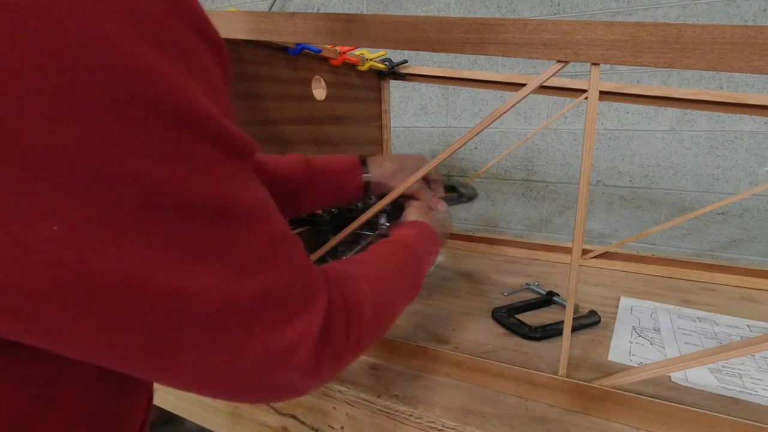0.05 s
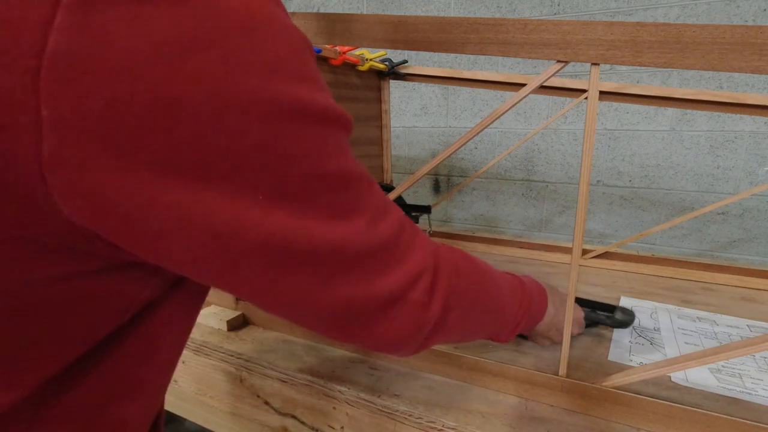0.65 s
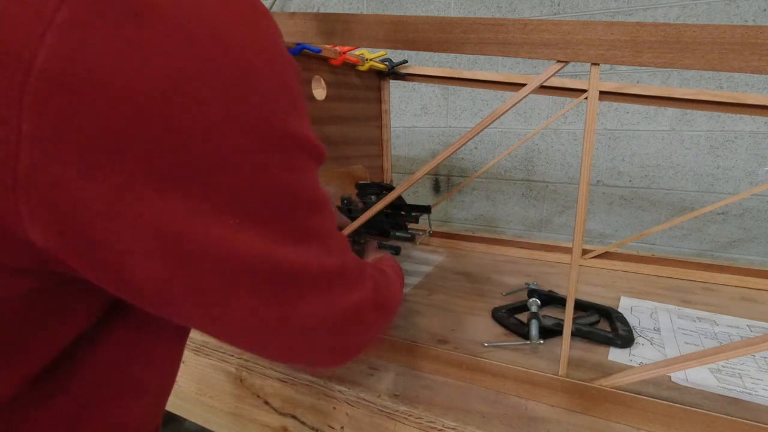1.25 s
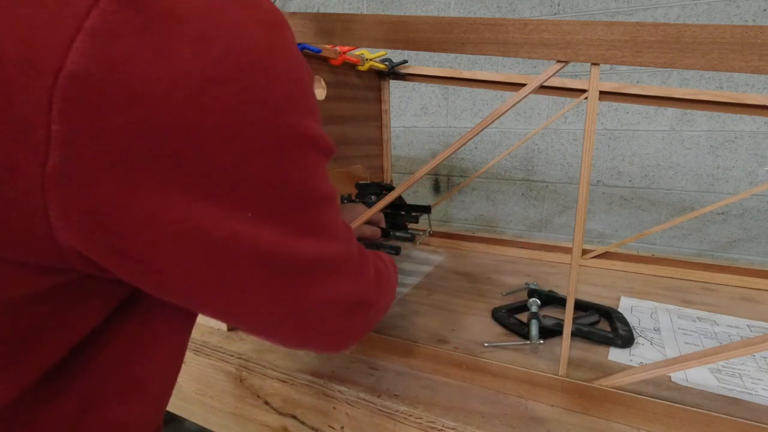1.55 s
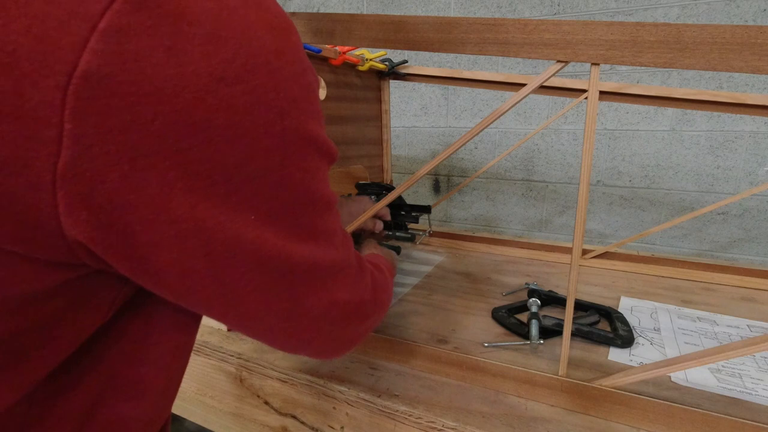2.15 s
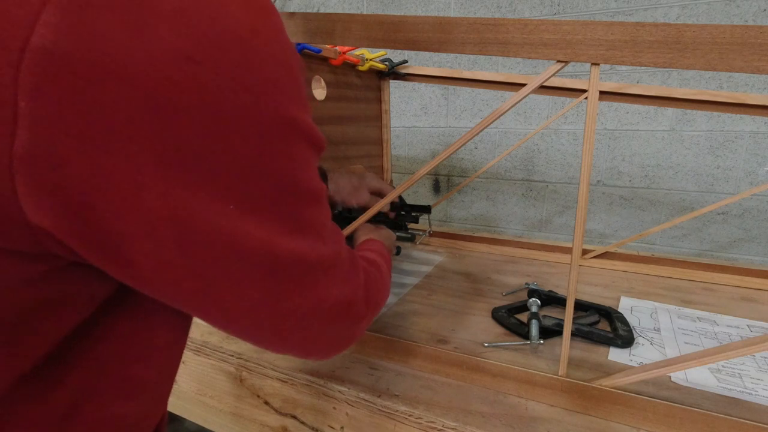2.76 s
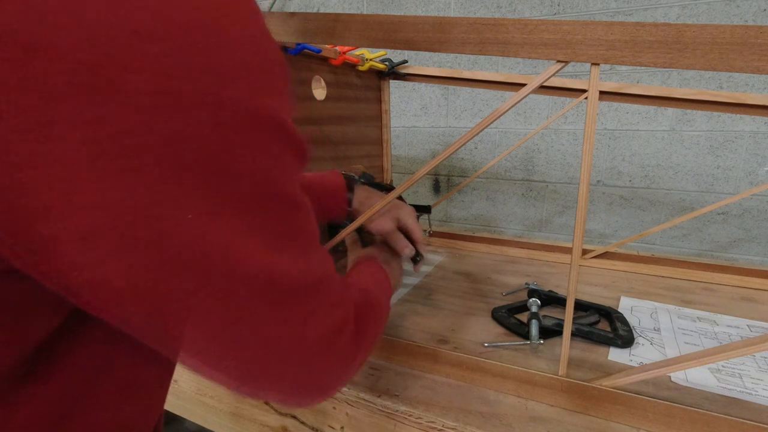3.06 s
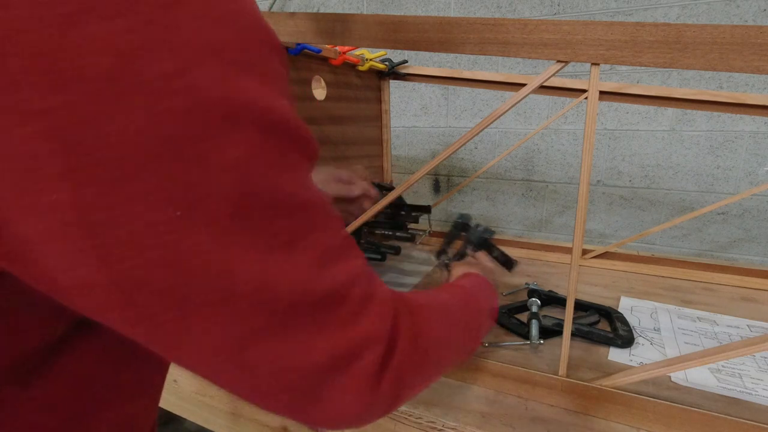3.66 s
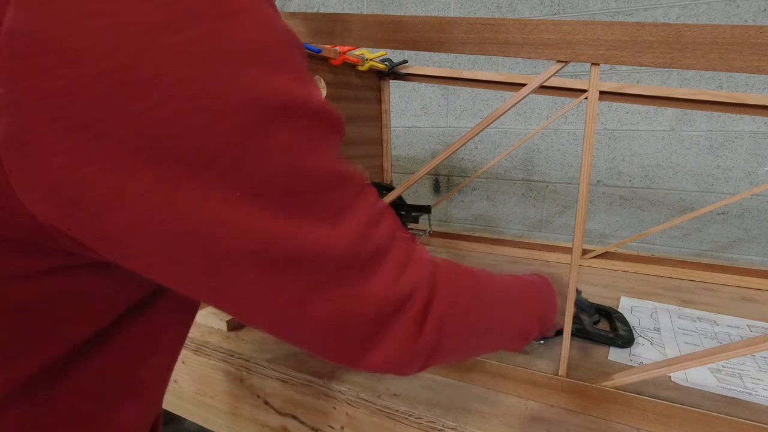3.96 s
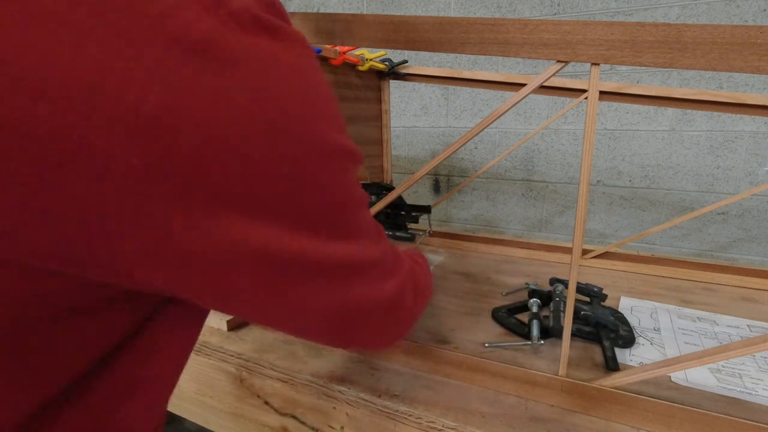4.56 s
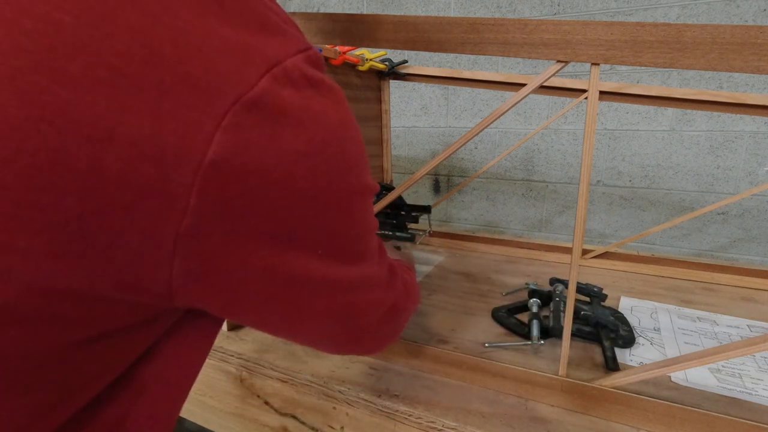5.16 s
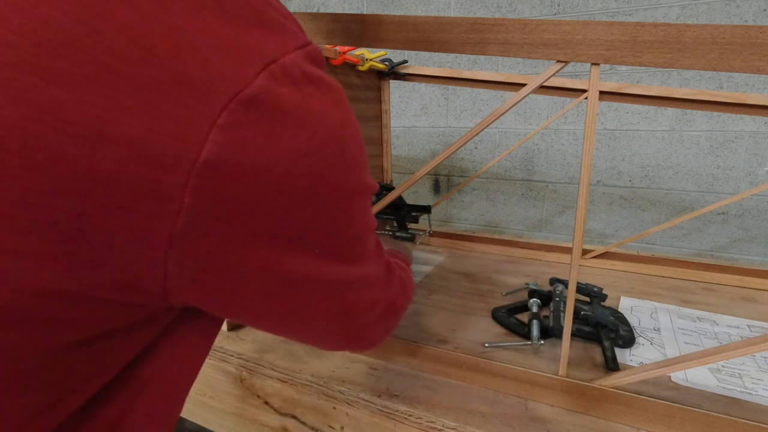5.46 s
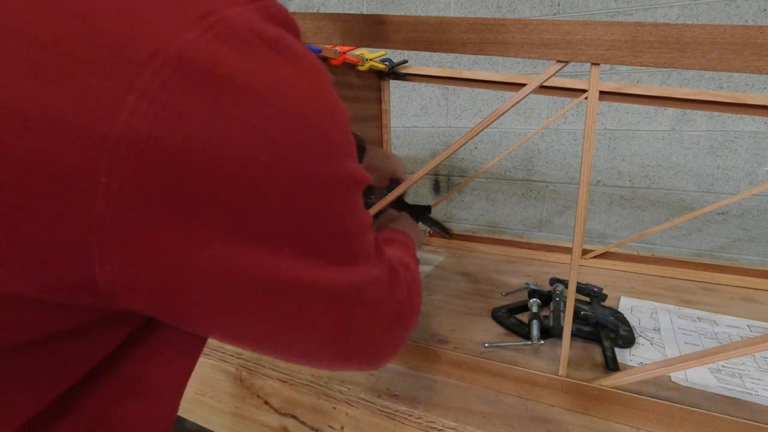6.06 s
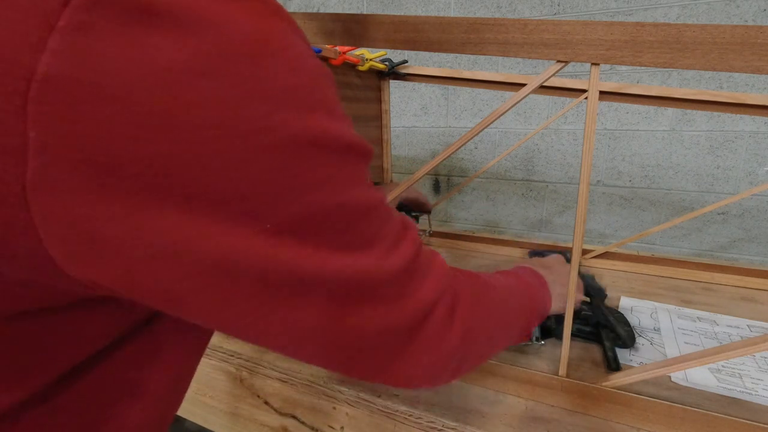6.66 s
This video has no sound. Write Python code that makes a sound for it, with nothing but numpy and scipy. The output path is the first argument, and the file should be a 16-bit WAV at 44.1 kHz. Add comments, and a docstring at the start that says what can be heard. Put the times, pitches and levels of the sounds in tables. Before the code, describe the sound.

Sleeves rustle, then a big steel clamp clatters onto a pile on a wooden workbench and rings briefly. Screw handles rattle and scrape, and a light wooden frame knocks. A smaller clamp is laid down with another ringing clatter. The frame knocks and creaks again as a jaw twists against it, and a tiny metal tinkle comes last. Two closely spaced microphones pick up the echo and faint hum of a hard-walled workshop.

```python
"""An earlier knock dies away as sleeves rustle and a big steel C-clamp rings faintly on a wooden frame.
At 0.7 s it clatters onto a pile on the workbench: each impact excites damped modes in the wood and
long-lived ones in the steel. Screw handles rattle and the light frame knocks; at 4.1 s a smaller clamp
is laid down, damped at first by the hand. From 5.1 s the frame knocks and creaks, and a pad tinkles last.
Throughout, a hard-walled workshop with a faint hum echoes into two closely spaced microphones."""
import sys
import numpy as np
from scipy import signal
from scipy.fft import rfft, irfft
from scipy.io import wavfile
from scipy.ndimage import uniform_filter1d

SR = 44100
rng = np.random.default_rng(int(sys.argv[2]) if len(sys.argv) > 2 else 0)


def master_out(mix):
    """Clip the mix to full scale and print it as 16-bit PCM to the path in sys.argv[1]."""
    frames = np.transpose(np.atleast_2d(mix))
    ceiling = np.clip(frames, -1, 1)
    pcm = np.round(ceiling * 32767).astype(np.int16)
    wavfile.write(sys.argv[1], SR, pcm)


N = 299880
T = np.arange(N) / SR
BANDS = 45 * 2 ** (np.arange(18) / 2)  # half-octave centres, Hz

# Sleeves and hands rubbing along the frame. Each row: time in seconds, level in dB.
RUB_LEVELS = [(0, -36), (.45, -47.5), (1.7, -51), (2.2, -57), (2.8, -54), (3.8, -58.5), (4.9, -53),
              (6.8, -52.5)]
# Spectra of rubbing, room air and sliding steel. Each row: frequency in Hz, relative density in dB.
RUB_SPECTRUM = [(18, -42.5), (30, -5), (97, 1.5), (253, -7), (655, -13.5), (742, -18), (863, -13),
                (954, -19), (1030, -17), (1420, -24), (2350, -29), (5250, -44.5), (12000, -99),
                (15600, -101), (22000, -120)]
AIR_SPECTRUM = [(12, -23), (20, -6), (77, -8.5), (104, -10.5), (150, -8), (310, -17.5), (357, -17),
                (399, -17), (574, -20.5), (624, -15.5), (1290, -25), (2390, -50), (13900, -60.5),
                (16000, -69.5)]
SCRAPE_SPECTRUM = [(300, -29.5), (1000, -1), (2100, 2), (3000, -2.5), (4200, 3.5), (6000, -19.5),
                   (10000, -20.5), (16000, -43)]
# Steady hum. Each row: frequency in Hz, level in dB.
HUM_TONES = [(60, -67), (70, -66), (120, -62.5), (571, -72)]
# First the tail of an earlier knock, then screws turning and handles sliding.
# Each row: start and length in seconds, level in dB, resonance in Hz.
TAIL_AND_SCRAPES = [(0, 0.16, -63.5, 2870), (1.814, 0.043, -55.5, 1970), (1.825, 0.0054, -44, 2090),
                    (1.856, 0.063, -71, 2040), (2.065, 0.11, -60, 2100), (2.45, 0.13, -75, 2100),
                    (4.119, 0.0067, -49, 3530), (5.114, 0.05, -60, 1400), (5.513, 0.03, -59, 2150),
                    (5.575, 0.069, -63, 2480), (5.767, 0.096, -64.5, 2420)]
# The big clamp brushing its neighbours. Each entry: start in seconds.
BRUSH_TIMES = [0.0042, 0.06, .235]
# Swivel pads tinkling. Each row: start in seconds, level in dB, top modes against low ones in dB.
PAD_CLINKS = [(4.012, -14, 9), (4.02, -19, 18), (6.503, -7, -8), (6.507, -5.5, -8)]
# Clamps striking the frame and the bench. Each row: start in seconds, strength in dB, weight (bass) and
# hardness (treble) in dB against strength, bite (extra clack near 2 kHz) in dB, resonance of the struck
# spot in Hz, its relative level in dB.
FRAME_BUMPS = [(.205, -33, -14, -42, 3, 890, 5), (.322, -35, -9.5, -36, -7, 860, 7.5),
               (2.411, -41.5, -3.5, -47, -5, 730, 5), (2.7555, -16, -13.5, -42, 1, 778, 1),
               (2.764, -15.5, -22.5, -52, 6, 560, -4.5), (2.85, -25.5, -3.5, -37, 1, 290, -5),
               (2.9325, -18.5, -5, -12, 4, 302, 0.5), (2.943, -20, -4, -21, -1.5, 132, 4),
               (2.955, -21, -25, -22, -6.5, 217, 1), (5.107, -34.5, -15, -7.5, 5.5, 570, -6),
               (5.126, -34, -4, -4, -3, 870, 0), (5.146, -35.5, -31, 3, 6.5, 535, 5.5),
               (5.217, -34.5, -5, -22, 0, 500, 4.5), (5.8795, -13, -7, -13.5, -10.5, 352, -7.5),
               (5.896, -18.5, -17, -44, -6, 240, 1), (5.91, -20.5, -4.5, -22, 2.5, 537, 1),
               (5.933, -19.5, -6.5, -13, -4.5, 193, 7.5), (5.959, -25, 0, -8.5, -1, 404, -2),
               (5.988, -25, -0.5, -5.5, -6.5, 198, 2), (6.005, -34.5, 6.5, -31, -2, 216, 11)]
BENCH_DROPS = [(.715, -13.5, -5.5, -19.5, 6, 396, -5.5), (.755, -13, -7.5, -17, -2.5, 900, -3.5),
               (.777, -21.5, -6, -8, 1, 634, -10), (.81, -21.5, -19, -15, 1, 348, -10),
               (.844, -20.5, -1, -19, 0.5, 666, -9), (.955, -28, -7, -19.5, 5, 1300, -10),
               (.991, -14.5, -5, -10, -10, 410, -7), (1.013, -13, -9.5, -13, -4.5, 388, -2),
               (1.081, -19.5, -8, -21, 3, 666, -2), (1.118, -17.5, -20, -32, -6, 520, -17),
               (1.146, -23.5, -9, -24, 14, 400, -15), (1.242, -20.5, -2.5, -23, -11, 310, -25),
               (1.249, -23, -12, -17, -2, 596, 0), (1.272, -21, -12, -26, 2.5, 632, -2),
               (1.335, -39, -7, -13, 8, 430, -8), (4.128, -29, 11, 0.5, -1.5, 200, 1),
               (4.131, -25.5, 0, -15, -8, 420, 1.5), (4.179, -36.5, 10, -40.5, -3, 205, 4),
               (4.203, -48.5, 12, 11, 2.5, 440, 4), (4.224, -45, 12, -36, -7.5, 205, 0.5),
               (4.361, -41, 14, -8, -3, 190, -2), (4.374, -21.5, 0, -22.5, 2, 617, -9),
               (4.417, -15.5, -6, -21, 6, 400, -2), (4.423, -23, -15, -26, 0, 384, 2),
               (4.458, -16.5, -9, -12, -6, 560, -1), (4.466, -20, -7.5, -15, -9, 575, 4.5),
               (4.482, -22, -2, -15.5, -6, 573, -12), (4.533, -36, 2.5, -18.5, 8, 230, 1)]
# Handles clicking. Each row: start in seconds, strength and hardness in dB, spot resonance in Hz.
HANDLE_CLICKS = [(1.146, -17.5, -18, 1920), (1.19, -20.5, -34, 1870), (1.334, -29.5, -22, 1550),
                 (1.807, -29.5, -19, 1730), (1.813, -31, -10, 1870), (1.834, -26.5, -1.5, 2150),
                 (1.843, -22, -11.5, 2040), (1.85, -27.5, -25, 745), (1.863, -24, -30, 728),
                 (2.051, -44.5, 10, 1870), (2.113, -31.5, -7.5, 1670), (2.138, -31, -36, 697),
                 (2.142, -34.5, -21, 2290), (2.204, -36, -16, 1880), (2.486, -34.5, -28, 2110),
                 (2.558, -45, -18.5, 2970), (2.757, -18.5, -43, 2170), (2.934, -18.5, -29, 2716),
                 (3.302, -61, -15, 4300), (3.5, -58, -7, 3100), (3.611, -62, -11, 3280),
                 (3.645, -63, -10, 3700), (3.72, -62, -12, 3420), (4.043, -62, 10, 4000),
                 (5.516, -28, -7, 1490), (5.521, -31, -4.5, 2000), (5.635, -38, -14, 2370),
                 (5.757, -55, -11, 4280), (6.209, -57, -1, 3720), (6.433, -44.5, -13.5, 3060),
                 (6.505, -51.5, 7, 3100)]
# Soft, hollow slips of a jaw on the frame. Each row: centre time in seconds, level in dB, pitch in Hz.
JAW_SLIPS = [(2.767, -22, 570), (5.111, -36, 540), (5.148, -32, 510), (5.187, -35, 450), (5.220, -36, 430),
             (5.563, -31, 560), (5.586, -31, 540), (5.5935, -20.5, 580), (5.602, -32, 600)]
# A jaw twisting against the wood. Each row: start and length in seconds, level in dB.
JAW_TWISTS = [(5.52, 0.11, -40), (5.738, 0.2, -50.5)]
# Colour of each kind of impact. Each row: frequency in Hz, gain in dB.
BUMP_SPECTRUM = [(50, 0.5), (90, -14.5), (130, 3.5), (175, -3.5), (250, -6.5), (400, -4), (700, -8.5),
                 (1000, -7), (1400, -10), (2500, -12), (4000, -13.5), (6500, -13.5), (9000, -0.5),
                 (11500, -37), (15000, -28)]
DROP_SPECTRUM = [(50, -12.5), (90, -7.5), (130, -29), (190, -1), (260, -5), (380, -8.5), (700, -3.5),
                 (1000, -9), (1500, -10), (2600, -8.5), (4000, 0.5), (6000, -2), (8200, 2.5), (11500, -9),
                 (15000, -10)]
RATTLE_SPECTRUM = [(50, -6.5), (150, -4), (400, -11), (800, -13.5), (1300, -10.5), (2100, -9.5), (4000, -9),
                   (7000, -10.5), (9500, 19), (12000, 6), (15000, 4)]
# Normal modes of each body. Each row: frequency in Hz, relative level in dB, 60 dB decay time in seconds.
SCREW_MODES = [(980, 1, 0.1), (2060, 2.5, 0.11), (2430, -4, 0.18), (3030, -7, 0.14), (4120, -10.5, .2),
               (4800, -17, .16), (5130, -14, 0.35), (5820, -9, 0.12)]
FRAME_MODES = [(57, -25, 1.5), (129.2, -19, 0.16), (203.7, 1.5, 0.23), (327, -14, 0.27), (426, 2.5, 0.21),
               (575, -2.5, 0.16), (744, -6.5, 0.31), (888, 4.5, 0.15), (1665, -2.5, 0.058),
               (2500, -17.5, 0.056)]
BENCH_MODES = [(60.9, -11, 2), (72.5, -23, 0.78), (131.6, -38, 0.28), (210, 3, 0.091), (294.3, -15, 0.14),
               (382, 1.5, 0.19), (560, -4.5, 0.25), (590, -2, 0.19), (768, -13.5, 0.53), (974, -11.5, 0.28),
               (1281, -8, 0.066)]
HANDLE_MODES = [(737, 8, 0.23), (966, 1.5, 0.25), (1705, 6.5, 0.11), (2015, -3, 0.15), (2230, -11, 0.15),
                (2420, -11, 0.16), (4134, -22, .22), (5870, -18, 0.22)]
PAD_MODES = [(3070, -8, .025), (3350, -4, 0.037), (3800, -4.5, 0.057), (4280, -6, 0.028), (5100, -4, 0.041),
             (5250, 3, 0.035), (5660, 0, 0.024), (6940, -14, 0.037), (7880, -18, 0.12), (9600, -16, .05),
             (9900, -17, 0.027), (10400, -10, 0.046), (10900, -11, .04), (10900, -11, 0.094),
             (11600, -20, .1), (12100, -15, .04), (14020, -23, .07)]
JAW_ON_WOOD_MODES = [(512, -6, 0.032), (548, -8, 0.053), (585, -4, 0.075), (730, -14, 0.027),
                     (899, -9, 0.054), (1260, -20, 0.018), (2370, -18, 0.007)]
# Normal modes of the big clamp, the small one damped by the hand, and the small one free.
# Each row: frequency in Hz, relative level in dB, 60 dB decay time in seconds.
BIG_CLAMP = [(2980, -17, 0.65), (3370, -17, 0.89), (3670, -18, .7), (3670, -8, 1.2), (3800, -19, 0.77),
             (3800, -12.5, 2.1), (3910, -17, 1.9), (4020, -11, .9), (4460, -29, 0.72), (4370, -18, 0.91),
             (5100, -13, 2), (5180, -10, 0.82), (5346, -7, 0.62), (5370, -10.5, 1.38), (5460, -8, 0.65),
             (7060, -16.5, 0.29), (7300, -28, 0.54), (7500, -16, 0.61), (8330, -10, 1.2), (8900, -18, 0.78),
             (8720, -11.5, .8), (9000, -14, 0.9), (9960, -19, 0.46), (11630, -21, 0.35),
             (11600, -22.5, 0.33), (12470, -20.5, 0.38), (12730, -24, 0.32), (13550, -23, .45),
             (13790, -25, .35), (14070, -20, .5), (14590, -12, 0.32), (14800, -20, 0.3)]
HELD_CLAMP = [(3500, -18.5, 0.19), (3820, 9.5, 0.48), (4086, -15, .3), (9400, 0, 0.28), (12470, -3, 0.23),
              (14550, -7, .22)]
SMALL_CLAMP = [(3050, -14, 1.5), (3660, -9, 0.67), (3830, -14, 1.9), (4140, -15, 1.2), (4600, -22, .8),
               (5000, -14, 0.27), (4980, -7, 1.46), (5030, -19, 2.6), (5335, -18, 1.1), (6020, -17, 1.3),
               (6900, -12, 0.82), (7530, -17, .6), (8010, -23, .4), (8700, -19.5, .6), (9360, -6.5, .3),
               (8990, -15.5, .45), (10060, -10, .3), (10700, -18, 0.57), (11200, -17.5, 0.64),
               (11560, -19.5, .25), (12470, -17.5, .3), (13400, -14, .26), (14460, -14, .28),
               (15360, -24, .2)]
# The clamp that rings. Each row: start in seconds, modes, ring gain in dB, grit (treble noise) in dB.
CLAMP_TURNS = [(0, BIG_CLAMP, -26.5, -6), (4, HELD_CLAMP, -31, 3.5), (4.3, SMALL_CLAMP, -22, 0.5)]
# Reverberation of the workshop. Each row: frequency in Hz, 60 dB decay time in seconds.
ROOM_DECAY = [(60, 1.62), (160, 0.49), (420, 1.01), (1100, 0.97), (3000, 1), (8000, 0.51), (15000, 0.18)]
# Colour of the reverberation. Each row: frequency in Hz, gain in dB.
ROOM_SPECTRUM = [(60, -1), (200, 0.5), (600, -8.5), (1500, -8.5), (4000, -10), (9000, -5), (15000, 2)]


def undb(db):
    """Amplitude grows tenfold with every 20 dB."""
    return 10 ** (np.asarray(db) / 20)


def unit(x):
    """Normalisation to an rms of 1."""
    return x / np.sqrt(np.mean(x ** 2))


def at(points, hz):
    """Interpolation of (Hz, value) points on a logarithmic frequency axis."""
    f, value = np.transpose(points)
    return np.interp(np.log(np.maximum(hz, 1)), np.log(f), value)


def band(x, hz):
    """Causal band-pass filtering, half an octave wide."""
    edges = np.minimum(hz * 2 ** (np.array([-1, 1]) / 4), .47 * SR)
    return signal.sosfilt(signal.butter(2 if hz < 1000 else 4, edges, "band", fs=SR, output="sos"), x)


def walk(rate):
    """Smooth random modulation with an rms of 1 and rate new values a second."""
    hold = int(SR / rate)
    steps = np.repeat(rng.standard_normal(N // hold + 1), hold)
    return unit(uniform_filter1d(steps, hold)[:N])


def add(track, s, x):
    """Superposition of a sound on a track, from s seconds."""
    i = max(int(s * SR), 0)
    track[i:i + len(x)] += x[:N - i]


def decay(t, t60):
    """Exponential damping: the amplitude falls 60 dB in t60 seconds."""
    return np.exp(-np.log(1000) * t / t60)


def ring(modes, drive=((1000, 0),), detune=0., rise_s=1e-5, wander_hz=0.):
    """Free vibration after a blow of spectrum drive (Hz, dB); grip and contact may shift the modes."""
    out = np.zeros(2 * SR)
    shifts_per_s = 60  # the body shifts on its contact points
    shifts = np.arange(128) / shifts_per_s
    for (hz, db, t60), chance in zip(modes, rng.standard_normal((len(modes), len(shifts)))):
        t = T[:int(min(t60 * .8, 2) * SR)]
        envelope = decay(t, t60) * (1 - np.exp(-t / rise_s))
        drift = np.interp(t, shifts, np.cumsum(chance) * wander_hz / shifts_per_s)
        cycles = hz * (1 + detune * chance[0]) * t + drift
        out[:len(t)] += undb(db + at(drive, hz)) * envelope * np.sin(2 * np.pi * cycles)
    return out


def diffuse(pair):
    """In a diffuse field, two nearby microphones are coherent only at long wavelengths."""
    size, spacing_m = pair.shape[1], 0.054
    coherence = np.sinc(2 * np.fft.rfftfreq(size, 1 / SR) * spacing_m / 343)
    mid, side = irfft(rfft(pair) * np.sqrt([(1 + coherence) / 2, (1 - coherence) / 2]), size)
    return np.array([mid + side, mid - side])


def wash(spectrum):
    """Filtered noise arriving as a diffuse field, with an rms of 1."""
    gain = undb(at(spectrum, np.fft.rfftfreq(N, 1 / SR)))
    return unit(diffuse(irfft(rfft(rng.standard_normal((2, N))) * gain, N)))


def sleeves_and_air(grain_db):
    """Friction of sleeves makes broadband noise, heard over room air and a faint hum."""
    rub = wash(RUB_SPECTRUM) * undb(np.interp(T, *np.transpose(RUB_LEVELS)) + grain_db * walk(42))
    hum = sum(undb(db) * np.sqrt(2) * np.sin(2 * np.pi * (hz * T + rng.random())) for hz, db in HUM_TONES)
    air = wash(AIR_SPECTRUM) * undb(-54 + .5 * walk(7.3))
    return rub + air + hum


def strokes(table, attack_share, release_share):
    """Envelopes add in power; each swells and fades exponentially, a longer one more slowly."""
    power = 0
    for start, length, db in table:
        progress = (T - start) / length
        away = np.maximum(-progress, 0) / attack_share + np.maximum(progress - 1, 0) / release_share
        power = power + (undb(db) * np.exp(-np.minimum(away, 20))) ** 2
    return np.sqrt(power)


def tail_and_scrapes(grain_db, jerk_db, sing_db, width_hz, screw_db):
    """Grainy noise drives the screw's modes and one peak: a knock's tail, later steel rubbing steel."""
    hz, out = np.fft.rfftfreq(N, 1 / SR), 0
    catches = rfft(rng.standard_normal(N) * undb(grain_db * walk(220) + jerk_db * walk(35)))
    grains = unit(irfft(catches * undb(at(SCRAPE_SPECTRUM, hz)), N))
    screw = unit(irfft(catches * rfft(ring(SCREW_MODES), N), N))
    for start, length, db, centre in TAIL_AND_SCRAPES:
        sing = unit(irfft(catches / (1 + 2j * (hz - centre) / width_hz) ** 2, N))
        steel = grains + undb(sing_db) * sing + undb(screw_db) * screw
        out = out + steel * strokes([(start, length, db)], attack_share=0.74, release_share=0.71)
    return out


def steel_clinks(pad_db, clamp_db):
    """Light impacts excite high modes: the big clamp rings faintly, swivel pads tinkle briefly."""
    out = np.zeros(N)
    for s, db, bright in PAD_CLINKS:
        drive = [(5000, pad_db + db), (10000, pad_db + db + bright)]
        add(out, s, ring(PAD_MODES, drive, detune=0.0034, rise_s=.0008, wander_hz=40))
    brush = [(5500, -15), (9000, -17.5), (14000, -22)]
    for s in BRUSH_TIMES:
        add(out, s, undb(clamp_db) * ring(BIG_CLAMP, brush, detune=0.0018, rise_s=0.0024, wander_hz=29.8))
    return out


def contacts(rows, clack_db, tick_db, tick_growth):
    """Harder impacts hold more treble. Levels in dB, low to high: thump, knock, clack, click, tick."""
    s, strength, weight, hardness, bite, hz, spot_db = np.transpose(rows)
    firm_db = -18  # strength of an ordinary, firm contact
    thump, click = strength + weight, strength + hardness
    clack = (strength + click) / 2 + clack_db + bite
    tick = click + tick_db + tick_growth * (strength - firm_db)
    return np.transpose([s, strength, thump, clack, click, tick, hz, spot_db])  # strength sets the knock


def decay_share(hardness_db):
    """The decay time of a contact halves with every 31.5 dB of hardness."""
    return 2 ** (-hardness_db / 31.5)


def impact_noise(table, spectrum, crack, crack_s, t60, chatter_db, rise_s):
    """Dense modes overlap into noise: each impact cracks, chatters and dies away, the treble first."""
    t, out = T[:SR // 5], np.zeros(N)
    centres_hz, widths_hz = [130, 550, 1900, 5000, 12000], np.array([190, 950, 1800, 6000, 5500])
    s, knock, thump, clack, click, tick, *_ = np.transpose(table)
    density = np.transpose([thump, knock, clack, click, tick]) - 10 * np.log10(widths_hz)
    band_density = np.array([at(list(zip(centres_hz, row)), BANDS) for row in density])
    band_db = band_density + at(spectrum, BANDS) + 10 * np.log10(BANDS / 3)
    knock_t60 = t60 * decay_share(click - knock)[:, None]
    noise, sounds = rng.standard_normal((len(s), len(BANDS), len(t))), 0
    moments = np.linspace(0, t[-1], 150)
    jitter = rng.standard_normal((len(s), len(moments)))
    chatter = undb(chatter_db * np.array([np.interp(t, moments, row) for row in jitter]))
    for k, hz in enumerate(BANDS):
        fade = decay(t, knock_t60 * (centres_hz[1] / hz) ** 0.31)  # damping grows with frequency
        envelope = (fade * chatter + crack * np.exp(-t / crack_s)) * (1 - np.exp(-t / rise_s))
        burst = band(noise[:, k] * envelope, hz)
        rms = np.sqrt(np.sum(burst ** 2, axis=1, keepdims=True) / (0.0096 * SR))  # as if 9.6 ms long
        sounds = sounds + burst * undb(band_db[:, k, None]) / rms
    for start, sound in zip(s, sounds):
        add(out, start, sound)
    return out


def frame_bumps(table, frame_db):
    """Loosened clamps strike the light frame, and each impulse excites its damped modes."""
    out = impact_noise(table, BUMP_SPECTRUM, crack=0.17, crack_s=0.0077, t60=0.089,
                       chatter_db=1.0, rise_s=0.0015)
    for s, knock, thump, *_ in table:
        add(out, s, undb(frame_db) * ring(FRAME_MODES, [(150, thump + 4), (450, knock)]))
    return out


def struck_spots(table, t60):
    """Local resonance: each struck spot favours one short-lived mode of its own."""
    out = np.zeros(N)
    for s, knock, thump, clack, click, _, hz, spot_db in table:
        mode = (hz, spot_db, t60 * decay_share(click - knock))
        drive = [(130, thump), (400, knock), (1900, clack), (5000, click)]
        add(out, s, ring([mode], drive, detune=0.0087, rise_s=0.0018))
    return out


def clamp_at(s):
    """The vibrating body at s seconds: modes, ring gain and grit of the clamp in hand."""
    return [row[1:] for row in CLAMP_TURNS if row[0] <= s][-1]


def clamp_drops(table, bench_db, clink_db, clink_share, waver_db):
    """A collision excites both bodies: the bench booms and the clamp rings, wavering as it settles."""
    grit = np.outer([clamp_at(s)[2] for s in table[:, 0]], [0, 0, 0, 0, 1, 1, 0, 0])  # click and tick
    wood = impact_noise(table + grit, DROP_SPECTRUM, crack=0.96, crack_s=0.00051, t60=0.13,
                        chatter_db=1.5, rise_s=0.000071)
    steel = np.zeros(N)
    for s, knock, thump, _, click, tick, *_ in table:
        add(wood, s, undb(bench_db) * ring(BENCH_MODES, [(200, thump + 3), (500, knock)], detune=0.0063))
        modes, ring_db, _ = clamp_at(s)
        # hard landings press the clamp into the pile, so the ring grows less than the click
        pressing_db = -0.15 * (click + 28)
        drive = [(7000, click + pressing_db), (12000, tick + 20 + pressing_db)]
        # pressed together, the clamp and a big one under it clank briefly; a weaker free ring stays
        pressed = [(hz, db, t60 * clink_share) for hz, db, t60 in modes + BIG_CLAMP]
        clink = undb(clink_db) * ring(pressed, drive, detune=0.0061, rise_s=0.00061)
        free = ring(modes, drive, detune=0.0013, rise_s=0.0019, wander_hz=26.04)
        add(steel, s, undb(ring_db) * (clink + free))
    return wood, steel * undb(waver_db * walk(28))


def handle_rattles(table, handle_db):
    """A loose handle bar stops abruptly in its screw, and the impulse excites the bar's modes."""
    out = impact_noise(table, RATTLE_SPECTRUM, crack=0.09, crack_s=0.002, t60=0.094,
                       chatter_db=2.5, rise_s=0.0011)
    for s, _, _, clack, *_ in table:
        add(out, s, undb(clack + handle_db) * ring(HANDLE_MODES, detune=0.0061))
    return out


def jaw_creak(catches_per_s, uneven_db):
    """Stick-slip friction: a jaw chatters unevenly on the wood, or lets go in one soft slip."""
    catches = (rng.random(N) < catches_per_s / SR) * undb(uneven_db * rng.standard_normal(N))
    chatter = unit(signal.fftconvolve(catches - catches.mean(), ring(JAW_ON_WOOD_MODES))[:N])
    out = chatter * strokes(JAW_TWISTS, attack_share=0.062, release_share=0.11)
    half_slip_s = 0.0027
    for when, db, hz in JAW_SLIPS:
        t = T - when
        out = out + undb(db) * np.exp(-(t / half_slip_s) ** 2) * np.cos(2 * np.pi * hz * t)
    return out


def arrive(x, lag_ms):
    """Unequal paths: direct sound reaches the left microphone lag_ms after the right."""
    turn = np.exp(-1j * np.pi * np.fft.rfftfreq(N, 1 / SR) * lag_ms / 1000)
    return irfft(rfft(x) * np.array([turn, 1 / turn]), N)


def workshop(x, build_s):
    """Reverberation: reflections build up from the near walls and die away, the deep bass last."""
    t, response = T[:int(1.5 * SR)], 0
    build = 1 - np.exp(-(t / build_s) ** 2)
    for hz in BANDS:
        tail = band(rng.standard_normal((2, len(t))), hz) * decay(t, at(ROOM_DECAY, hz)) * build
        share = 2 * (hz / 3) / SR  # this band's part of the whole spectrum
        energy = np.sum(tail ** 2, axis=1, keepdims=True)
        response = response + tail * undb(at(ROOM_SPECTRUM, hz)) * np.sqrt(share / energy)
    return signal.fftconvolve(x[None], diffuse(response), axes=1)[:, :N]


def scene():
    """Direct and reverberant fields add; time lags put the pile right and the frame a little left."""
    on_bench = contacts(BENCH_DROPS, clack_db=-2.0, tick_db=-26.5, tick_growth=0.092)
    on_frame = contacts(FRAME_BUMPS, clack_db=-1.0, tick_db=-38.0, tick_growth=2.5)
    weight_db, spot_db = -12.5, 4  # alike for all the light handles
    handles = [(s, db, weight_db, hardness, 0, hz, spot_db) for s, db, hardness, hz in HANDLE_CLICKS]
    on_screw = contacts(handles, clack_db=-4.5, tick_db=-40, tick_growth=0.18)
    wood, steel = clamp_drops(on_bench, bench_db=-13.5, clink_db=19.5, clink_share=0.16, waver_db=4.0)
    wood += struck_spots(on_bench, t60=0.066)
    frame = frame_bumps(on_frame, frame_db=-23.0) + struck_spots(on_frame, t60=0.03)
    frame += jaw_creak(catches_per_s=260, uneven_db=2.5)
    screws = handle_rattles(on_screw, handle_db=-15.5) + struck_spots(on_screw, t60=0.025)
    screws += tail_and_scrapes(grain_db=2, jerk_db=4.5, sing_db=-5, width_hz=150, screw_db=-3.0)
    clinks = steel_clinks(pad_db=-40.5, clamp_db=-54)
    direct = arrive(wood, lag_ms=0.084) + arrive(steel + clinks, lag_ms=0.036)
    direct += arrive(frame + screws, lag_ms=-0.035)
    echoes = workshop(wood + frame + screws + undb(2.5) * steel + undb(-5.0) * clinks, build_s=0.0036)
    return direct + echoes + sleeves_and_air(grain_db=1.2)


def record(dry):
    """Band limiting: a steep low-pass filter removes the treble above 15.7 kHz."""
    return signal.sosfilt(signal.ellip(8, .2, 70, 15700, fs=SR, output="sos"), dry)


dry = scene()
out = record(dry)
master_out(out)
```